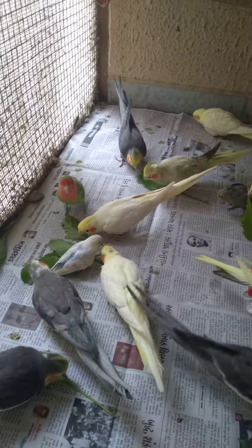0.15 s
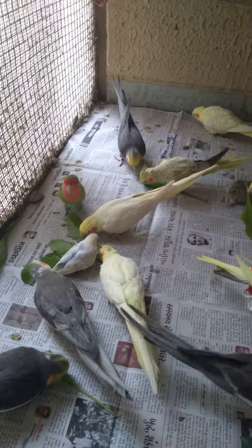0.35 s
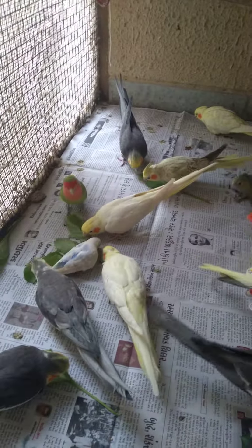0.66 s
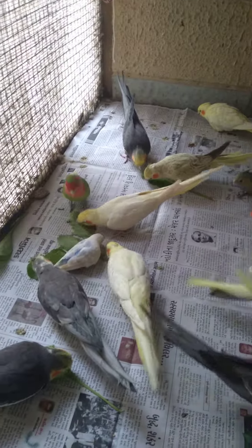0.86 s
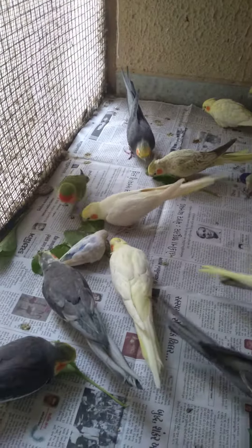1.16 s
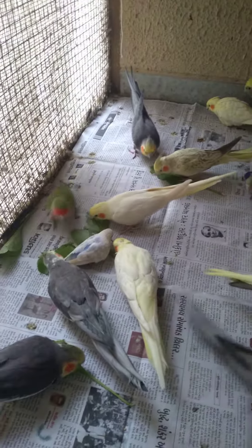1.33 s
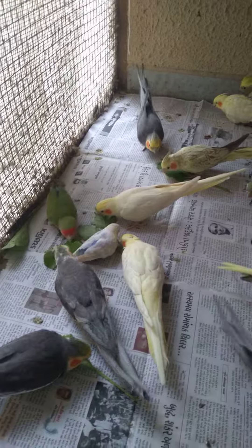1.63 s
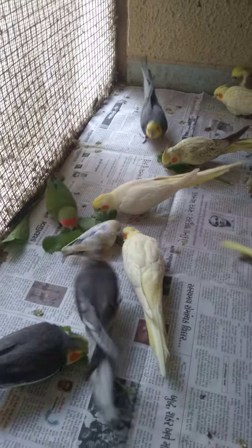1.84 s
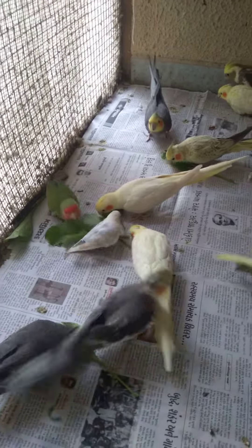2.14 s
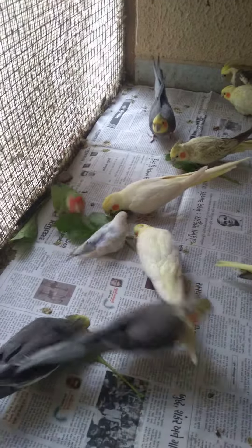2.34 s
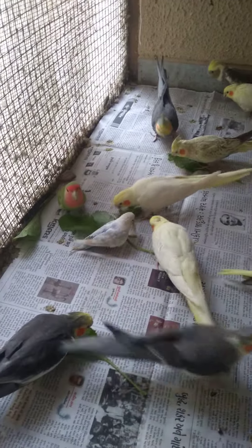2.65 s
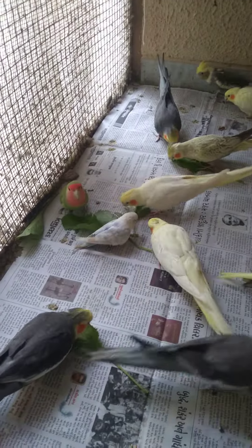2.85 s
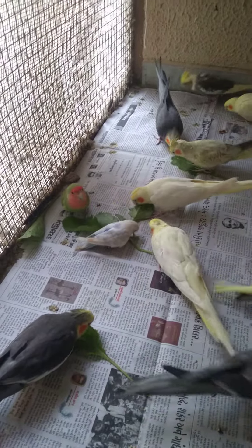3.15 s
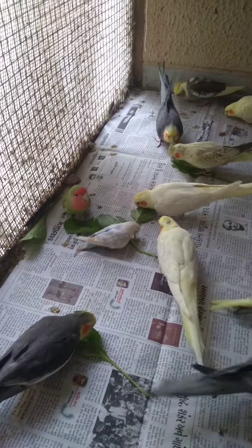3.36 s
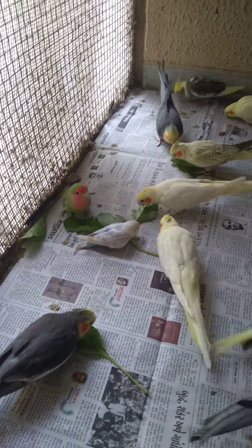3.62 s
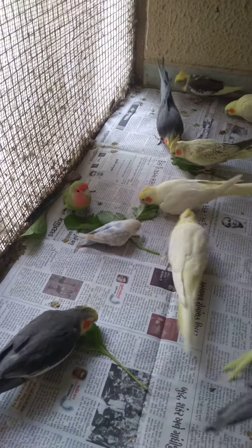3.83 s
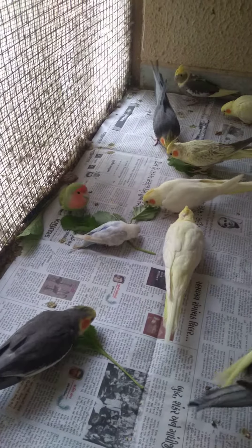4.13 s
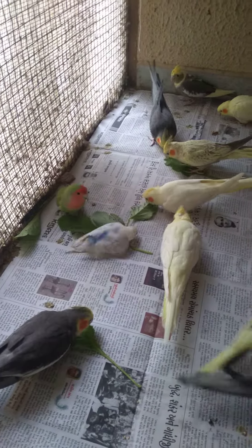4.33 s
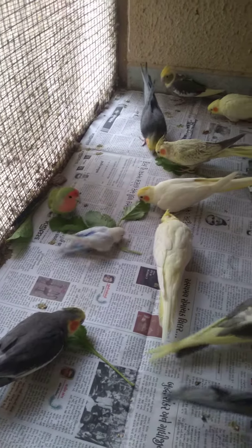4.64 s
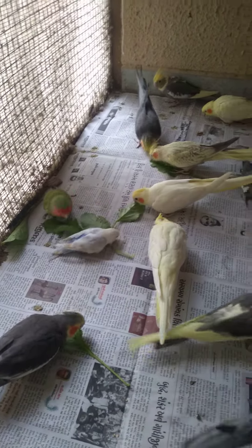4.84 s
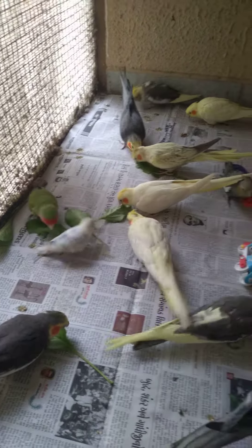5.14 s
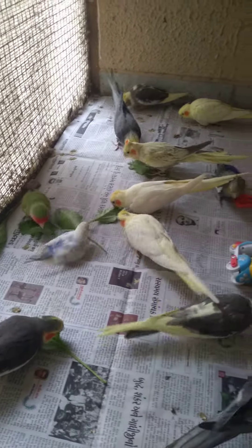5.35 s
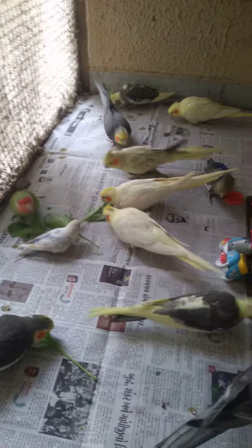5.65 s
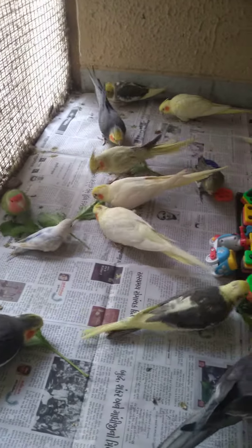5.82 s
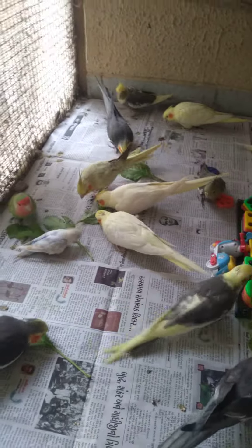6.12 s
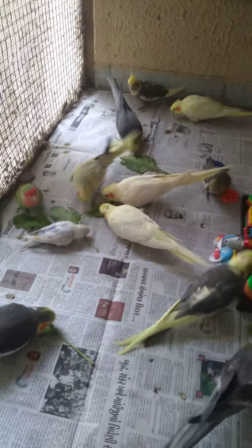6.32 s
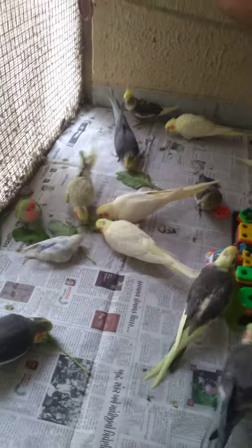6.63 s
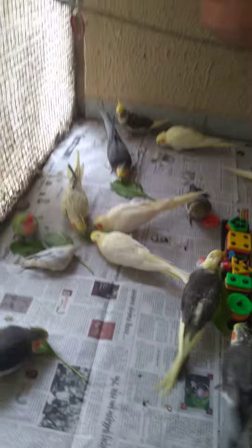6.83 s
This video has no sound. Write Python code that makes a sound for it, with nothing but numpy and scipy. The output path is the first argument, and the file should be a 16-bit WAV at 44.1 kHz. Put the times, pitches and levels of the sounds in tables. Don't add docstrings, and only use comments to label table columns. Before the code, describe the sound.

Small parrots snap beaks at leaves and rustle over newspaper in a bare-walled aviary, with brief chirps, squawks and a low traffic hum.

```python
import sys
import numpy as np
from scipy import signal
from scipy.fft import rfft, irfft, next_fast_len
from scipy.io import wavfile
from scipy.ndimage import uniform_filter1d, map_coordinates

SR = 44100
rng = np.random.default_rng(int(sys.argv[2]) if len(sys.argv) > 2 else 0)


def dump_mix(stems):
    frames = np.atleast_2d(stems).T
    limited = np.clip(frames, -1, 1)
    pcm = np.round(limited * 32767).astype(np.int16)
    wavfile.write(sys.argv[1], SR, pcm)


def voltage_ratio(decibels):
    exponent = np.asarray(decibels, float) / 20
    return 10 ** exponent


N = 307818


def unit(x):
    return x / np.sqrt(np.mean(x ** 2) + 1e-20)


def along(points, hz):
    f, v = np.transpose(points)
    return np.interp(np.log(hz + 1), np.log(f + 1), v)


def curves(rows, t):
    s, *cols = np.transpose(rows)
    return [np.interp(t, s, c) for c in cols]


def wobble(rate, size=N):
    knots = rng.standard_normal(int(size * rate / SR) + 4)
    return map_coordinates(knots, [np.arange(size) * rate / SR])


def strokes(rows):
    t = np.arange(N) / SR
    return sum(voltage_ratio(db) * np.exp(-8 * ((t - s) / length) ** 2) for s, length, db in rows)


def filtered(x, response):
    m = next_fast_len(N + 8192)
    return irfft(rfft(x, m) * response(np.fft.rfftfreq(m, 1 / SR)), m)[..., :N]


# f/Hz, likeness [0-1]
PORT_LIKENESS = [(30, 0.78), (120, 0.81), (300, 0.77), (900, 0.194), (2500, 0.0056)]


def rush(spectrum, patchy_db):
    z = signal.stft(rng.standard_normal((2, N + 512)), nperseg=512)[2]
    field = uniform_filter1d(rng.standard_normal(z.shape[1:]), size=6, axis=0)
    field = uniform_filter1d(field, size=8, axis=1)
    pair = signal.istft(z * voltage_ratio(patchy_db * unit(field)), nperseg=512)[1][:, :N]

    def mid_side(hz):
        turn = np.arccos(np.clip(along(PORT_LIKENESS, hz), -1, 1)) / 2
        return voltage_ratio(along(spectrum, hz)) * [np.cos(turn), np.sin(turn)]

    mid, side = filtered(pair, mid_side)
    return unit(np.array([mid + side, mid - side]))


def add(mix, s, sound, pan_db, lag):
    for port, way in enumerate((1, -1)):
        start = max(round(s * SR + way * lag / 2), 0)
        part = mix[port, start:][:len(sound)]
        part += voltage_ratio(way * pan_db / 2) * sound[:len(part)]


def small(rows, hz):
    chance = rng.standard_normal((len(rows), 2))
    return [(s, db, hz * (1 + 0.12 * a), 1.5 + 6 * b) for (s, db), (a, b) in zip(rows, chance)]


# t/s, peak level/dB, f/Hz, left-right/dB
SNAPS = [(0.1119, -29, 5400, 0.5), (0.2683, -40, 4270, 0), (0.3952, -39, 8100, -1.5),
         (0.4252, -33, 4100, 0), (1.4004, -42, 4370, 3), (1.5092, -35.5, 3820, 2),
         (2.005, -38.5, 4700, 0.5), (2.0845, -33, 6280, 6.5), (2.2355, -38.5, 7500, -1),
         (2.2874, -40, 5200, 6.5), (2.389, -35.5, 6100, 8), (2.6443, -37, 5100, 3),
         (2.6982, -40, 7800, 6.5), (2.719, -39.5, 6500, -1.5), (3.088, -43, 4480, 1),
         (3.531, -42, 7600, 5.5), (3.701, -30.5, 4070, 1.5), (3.8399, -36, 3270, 1),
         (3.8744, -29, 3730, -0.5), (4.051, -34, 3530, 1), (4.0809, -31.5, 4190, 0),
         (4.1906, -37, 8800, 4.5), (4.42, -36, 6680, -0.5), (4.449, -36.5, 8840, 2.5),
         (4.644, -35.5, 5000, 4.5), (4.755, -34, 3300, -2), (4.796, -36, 9400, -4.5),
         (4.8866, -31, 7500, -1), (5.735, -31.5, 4840, 0.5), (5.7948, -36, 4730, -1)]
# t/s, peak level/dB
BITES = [(.5262, -46), (.7792, -46.5), (1.1767, -47.5), (1.254, -41.5), (1.4591, -47.5), (1.6327, -40.5),
         (1.9042, -40), (2.7862, -41.5), (2.882, -47), (3.0069, -45), (3.041, -42), (3.2294, -62),
         (3.7854, -45), (4.5984, -46), (4.737, -62), (4.8634, -43.5), (5.0018, -49), (5.597, -43),
         (5.7201, -47), (6.0515, -44), (6.6634, -47.5), (6.813, -38)]
# t/s, peak level/dB
CLAW_TICKS = [(.38, -50), (1.3457, -52), (1.8452, -47), (2.7122, -40.5), (3.5968, -47.5), (5.3766, -46),
              (5.393, -41.5), (5.5278, -41), (5.652, -39.5), (6.5047, -38)]
# t/s, peak level/dB
TEARS = [(0.507, -50.5), (0.7041, -62), (0.8808, -63), (0.9324, -58), (1.1045, -59), (1.74, -58),
         (1.9647, -53), (2.9571, -56.5), (3.0578, -45.5), (3.261, -47), (3.7653, -49.5), (4.2348, -45.5),
         (4.2664, -40.5), (4.5526, -52), (4.6498, -32), (5.0795, -56), (5.3248, -60.5), (5.358, -47),
         (5.607, -41.5), (5.878, -52), (5.9828, -55.5), (5.9973, -62), (6.8044, -49), (6.917, -49.5)]


def pecks():
    mix, t = np.zeros((2, N)), np.arange(SR // 8) / SR
    crack = voltage_ratio(-60 * t / .008) * (1 - np.exp(-t / .001)) ** 2
    crinkle = .1 * voltage_ratio(-60 * t / .07) * (1 - np.exp(-t / .002))
    high_pass = signal.butter(2, 3600, "high", fs=SR, output="sos")
    events = [*SNAPS, *small(BITES, 5070), *small(CLAW_TICKS, 8830), *small(TEARS, 6400)]
    for s, db, hz, pan_db in events:
        ragged = voltage_ratio(3 * wobble(900, len(t)))
        burst = rng.standard_normal(len(t)) * (crack + crinkle) * ragged
        broad = signal.sosfilt(high_pass, burst)
        hump = signal.lfilter(*signal.iirpeak(hz, 3.5, SR), burst)
        snap = 0.86 * (hz / 5000) * broad + 1.25 * hump
        add(mix, s - .0015, voltage_ratio(db + 5.0) * snap / np.abs(snap).max(), pan_db, rng.uniform(-12.5, 14))
    return mix


# t/s, peak level/dB, level of the modes under 900 Hz/dB
DISH_BLOWS = [(0.111, -48, -11.5), (0.429, -58, -6.5), (1.177, -45.5, -22.5), (3.199, -40.5, -11),
              (3.341, -49.5, -6.5), (3.381, -49, -17.5), (3.672, -41.5, -13), (3.699, -27, -15.5),
              (3.837, -38.5, -26), (3.857, -38, -18.5), (3.874, -39, -15.5), (4.059, -30, -7),
              (4.082, -35.5, -19), (4.417, -50, -3), (4.489, -49.5, -23), (4.894, -50, -3.5),
              (5.53, -49, -6), (5.62, -50.5, 5), (5.722, -47.5, -7), (5.912, -55, -12.5), (6.067, -52, -16),
              (6.804, -78, -12.5)]
# f/Hz, level/dB, t60/s
DISH_MODES = [(474.6, 4, 0.0308), (620, 1, 0.069), (712.6, 7, 0.063), (952, -5.5, 0.0635),
              (1281.4, -2.5, 0.0358), (1403, 4.5, 0.0285), (1596, -1, 0.033), (1775, -4, 0.021)]


def knocks():
    mix, t = np.zeros((2, N)), np.arange(SR // 6) / SR
    for s, db, low_db in DISH_BLOWS:
        ring = np.zeros(len(t))
        for hz, level, t60 in DISH_MODES:
            mode_db = level + low_db * (hz < 900) + rng.normal(0, 2)
            ring += voltage_ratio(mode_db - 60 * t / t60) * np.sin(2 * np.pi * hz * rng.normal(1, .015) * t)
        rattle = 1 + .3 * wobble(500, len(t))
        ring = ring * rattle * (1 - np.exp(-t / 0.00058))
        add(mix, s, voltage_ratio(db) * ring / np.abs(ring).max(), -1.2, rng.uniform(3.7, 9.1))
    return mix


CALL_PAN_DB, CALL_LAG = .5, 3


def sing(rows, voice):
    rough, overtones_db, peak, rise_db, fall_db = voice
    mix = np.zeros((2, N))
    for s, length, first, last, db in rows:
        t = np.arange(s, s + length, 1 / SR)
        path = [(s, first, db - rise_db),
                (s + peak * length, first + peak * (last - first), db),
                (s + length, last, db - fall_db)]
        pitch, level_db = curves(path, t)
        phase = 2 * np.pi * np.cumsum(pitch * (1 + .2 * rough * wobble(900, len(t)))) / SR
        tone = np.sin(phase)
        for k, overtone_db in enumerate(overtones_db, start=2):
            tone += voltage_ratio(overtone_db) * np.sin(k * phase) * (k * pitch < SR / 3)
        flutter = voltage_ratio(1.5 * wobble(120, len(t)) + 5 * rough * wobble(600, len(t)))
        swell = voltage_ratio(level_db + 1.0) * signal.windows.tukey(len(t), .1)
        add(mix, t[0], swell * tone * unit(flutter), CALL_PAN_DB, CALL_LAG)
    return mix


def rasps(rows, throat):
    bursts_hz = 241.3 * (1 + 0.2493 * wobble(60))
    beat = np.sin(2 * np.pi * np.cumsum(bursts_hz) / SR)
    breath = rng.standard_normal(N) * (1 + 0.35 * beat)

    def resonances(f):
        return sum((-1) ** k * voltage_ratio(db) * 1j * f * w / (c * c - f * f + 1j * f * w)
                   for k, (c, w, db) in enumerate(throat))

    mix = np.zeros((2, N))
    add(mix, 0, strokes(rows) * unit(filtered(breath, resonances)), CALL_PAN_DB, CALL_LAG)
    return mix


# t/s, length/s, first f/Hz, last f/Hz, peak level/dB
WHISTLE_NOTES = [
    (.054, .03, 2770, 2870, -45),
    (.066, .052, 3620, 3560, -33.5),
    (3.125, .06, 3210, 3200, -55),
]
REEDY_NOTES = [
    (6.275, .065, 1445, 1440, -46),
    (6.34, .05, 1440, 1450, -50),
]
CLIMB_NOTES = [
    (6.322, .02, 1620, 1720, -45),
    (6.338, .026, 2080, 2020, -39),
    (6.361, .048, 2400, 2410, -38),
]
TOP_NOTES = [
    (6.407, .038, 2570, 2580, -33),
]
CHATTER_NOTES = [
    (.112, 0.11, 3050, 2900, -44.5),
    (.12, 0.14, 3600, 3650, -47.5),
    (.395, 0.0755, 2204, 2560, -57),
    (2.515, 0.1014, 2600, 2780, -39.5),
    (3.345, 0.139, 3141, 3200, -54.5),
    (6.338, .055, 1698, 1848, -41.5),
]
# roughness [0-1], overtone levels/dB, peak [share of length], rise/dB, fall/dB
WHISTLE_VOICE = (.22, (-16,), .45, 14, 6)
REEDY_VOICE = (.1, (-5, -30, -17), .6, 12, 3)
CLIMB_VOICE = (.15, (-20,), .5, 4, 3)
CLEAR_VOICE = (.05, (-14,), .5, 4, 8)
CHATTER_VOICE = (.36, (-12, -18), .3, 5, 10)
# t/s, length/s, level/dB
SQUAWKS = [
    (2.432, 0.044, -43.5),
    (2.49, 0.102, -37),
    (2.55, 0.118, -47),
]
HISS_CRIES = [
    (3.13, 0.085, -50.5),
    (3.19, 0.072, -49),
    (3.335, 0.066, -46),
    (3.385, 0.049, -49.5),
    (3.455, 0.0485, -51),
]
# f/Hz, width/Hz, level/dB
SQUAWK_THROAT = [(2280, 350, -2.5), (3650, 550, 0.5), (4590, 546, 2), (5660, 290, -3), (7500, 3000, -11)]
HISS_THROAT = [(3200, 700, -0.5), (4150, 570, 2), (4780, 700, 1), (5880, 750, -2)]


def near_birds():
    calls = sing(WHISTLE_NOTES, WHISTLE_VOICE) + sing(CHATTER_NOTES, CHATTER_VOICE)
    rising = sing(REEDY_NOTES, REEDY_VOICE) + sing(CLIMB_NOTES, CLIMB_VOICE) + sing(TOP_NOTES, CLEAR_VOICE)
    return calls + rising + rasps(SQUAWKS, SQUAWK_THROAT) + rasps(HISS_CRIES, HISS_THROAT)


# t/s, rustle level/dB
FLOCK_BUSTLE = [(0, -66), (.35, -72), (1.0, -70.5), (2.0, -68.5), (2.8, -69.5), (3.6, -67), (4.3, -65),
                (5.1, -69), (6.0, -65.5), (6.98, -67.5)]
# t/s, length/s, level/dB
PAPER_SHUFFLES = [(.15, 0.213, -56), (.53, 0.33, -67.5), (.97, 0.08, -74), (1.3, 0.42, -66),
                  (1.56, 0.13, -64.5), (1.98, 0.19, -79), (2.2, 0.24, -62.5), (2.43, 0.19, -55.5),
                  (2.64, 0.24, -59.5), (3.17, 0.22, -57.5), (3.41, 0.34, -62), (3.8, 0.3, -71),
                  (4.25, 0.5, -62.5), (4.48, 0.19, -62.5), (4.73, 0.31, -61.5), (4.95, 0.115, -64.5),
                  (5.17, 0.4, -67.5), (5.4, 0.08, -73), (5.6, 0.3, -64.5), (6.4, 0.32, -61.5),
                  (6.93, 0.25, -67)]
# t/s, length/s, level/dB
BODY_SCUFFLES = [(.1, .15, -84.5), (.44, 0.2, -70), (.68, 0.164, -70), (1.19, 0.22, -66.5),
                 (1.43, 0.213, -72), (1.65, 0.091, -73), (1.95, 0.35, -70), (2.52, 0.37, -63.5),
                 (3.19, 0.208, -65), (3.44, 0.244, -72), (3.75, 0.2, -58), (3.87, 0.16, -57.5),
                 (4.09, 0.1515, -51), (4.19, 0.14, -60), (4.5, 0.12, -61), (5.6, 0.25, -67.5),
                 (5.92, 0.592, -66), (6.33, 0.313, -64), (6.71, 0.138, -73)]
# f/Hz, level per Hz/dB
CRISP_PAPER = [(900, -9.5), (1500, -9), (2500, 0), (4300, -1), (5600, -4), (8800, -3.5), (10200, -15),
               (12500, -21.5), (16000, -32)]
DULL_PAPER = [(250, -54), (480, 4), (900, 2.5), (1600, 1), (2100, -4), (4000, -80)]


def rustle():
    busy = voltage_ratio(curves(FLOCK_BUSTLE, np.arange(N) / SR)[0])
    crisp_gain = np.hypot(busy, strokes(PAPER_SHUFFLES))
    dull_gain = np.hypot(voltage_ratio(-7.5) * busy, strokes(BODY_SCUFFLES))
    crackle_size = voltage_ratio(6.06 * np.minimum(rng.exponential(size=(2, N)), 3))
    crackles = (rng.random((2, N)) < 110 / SR) * crackle_size
    grit = signal.lfilter([1], [1, -.97], crackles)
    crisp = unit(rush(CRISP_PAPER, patchy_db=2.5) * (1 + 0.75 * grit))
    dull = rush(DULL_PAPER, patchy_db=3.5)
    gust = wobble(25)
    crisp_gust = voltage_ratio(7.0 + 2.8 * gust)
    dull_gust = voltage_ratio(4.0 + 0.94 * gust + 0.47 * wobble(22))
    return crisp_gain * crisp_gust * crisp + dull_gain * dull_gust * dull


# t/s, length/s, level/dB
CLAW_DRAGS = [
    (.415, 0.038, -46),
    (2.012, 0.077, -51.5),
    (2.083, 0.0118, -47),
    (4.205, 0.034, -46.5),
    (4.273, .02, -72),
    (4.652, 0.053, -45.5),
    (4.892, 0.048, -47),
    (6.82, 0.03, -48.5),
]


def claw_scrapes():
    return strokes(CLAW_DRAGS) * voltage_ratio(1.4 * wobble(300)) * rush(CRISP_PAPER, patchy_db=0.0)


# t/s, peak level/dB, f/Hz
LANDINGS = [
    (2.098, -48, 299.6),
    (3.2, -44, 414),
    (3.36, -70, 236),
    (3.879, -69, 130),
    (5.63, -46.5, 175),
    (6.82, -42.5, 265.8),
]


def landings():
    mix, t = np.zeros((2, N)), np.arange(SR // 6) / SR
    for s, db, hz in LANDINGS:
        thud = voltage_ratio(db - 60 * t / 0.068) * np.sin(2 * np.pi * hz * t)
        add(mix, s, thud * (1 - np.exp(-t / 0.0017)), -1.5, 3)
    return mix


# t/s, length/s, level/dB
WING_SWISHES = [
    (3.36, .05, -56),
    (4.24, .02, -59),
    (4.402, 0.041, -49),
    (4.882, 0.042, -63),
    (6.9, 0.12, -65),
]
# f/Hz, level per Hz/dB
FEATHER_HISS = [(6000, -18), (10000, 0.5), (13500, 6.5), (15500, 2)]


def feathers():
    return (strokes(WING_SWISHES) + voltage_ratio(-81.0)) * rush(FEATHER_HISS, patchy_db=1.5)


# t/s, length/s, first f/Hz, last f/Hz, peak level/dB
FAR_NOTES = [(1.09, 0.0687, 5110, 4150, -59), (1.12, 0.082, 2880, 2750, -62.5),
             (1.515, 0.098, 3292, 3259, -52), (1.89, .11, 2003, 2040, -67),
             (2.155, 0.055, 3200, 3200, -56.5), (4.29, 0.102, 3200, 3234, -60),
             (4.545, 0.058, 3188, 3230, -56.5), (5.08, 0.082, 4094, 3440, -56),
             (5.2, 0.067, 3135, 2430, -61.5), (6.105, 0.0406, 3590, 3250, -54.5),
             (6.165, 0.068, 2940, 2370, -58.5)]
# roughness [0-1], overtone levels/dB, peak [share of length], rise/dB, fall/dB
FAR_VOICE = (0.185, (), 0.14, 9, 8.3)


def far_birds():
    return sing(FAR_NOTES, FAR_VOICE)


# f/Hz, t60/s
WALL_DECAY = [(300, .3), (2500, .3), (8000, .22), (14000, .12)]


def room(x, chunk=11025):
    wet = np.zeros((2, N + chunk + SR // 2))
    for k in range(0, N, chunk):
        hz, t, z = signal.stft(rng.standard_normal((2, SR // 2)), SR, nperseg=256)
        decay = voltage_ratio(-60 * t / along(WALL_DECAY, hz)[:, None])
        tail = signal.istft(z * decay, SR, nperseg=256)[1][:, :SR // 2 - 256]
        echo = signal.fftconvolve(x[:, k:k + chunk], tail / np.linalg.norm(tail[0]), axes=1)
        start = k + 200
        wet[:, start:start + echo.shape[1]] += echo
    return wet[:, :N]


# f/Hz, level per Hz/dB
ROAD_SPECTRUM = [(8.8, -34), (15, 6.5), (48, -2.5), (113, -20), (172, -18), (253, -27), (315, -23.5),
                 (371, -29), (516, -29), (587, -35), (946, -41), (1060, -61), (1200, -57.5), (1560, -69.5),
                 (2640, -120)]
# t/s, level/dB
ROAD_SWELL = [(0.0, -46), (1.98, -46), (5.62, -47), (5.73, -42.5), (6.77, -48.5), (6.98, -47)]


def traffic():
    t = np.arange(N) / SR
    rumble = voltage_ratio(curves(ROAD_SWELL, t)[0]) * rush(ROAD_SPECTRUM, patchy_db=1.28)
    mains = voltage_ratio(-66.0 + 1.2 * wobble(5.2)) * np.sin(2 * np.pi * 120.5 * t)
    return rumble + mains


# f/Hz, level/dB
TREBLE_LOSS = [(8800, 2.5), (10000, -4), (11500, -14), (15500, -20)]


def scene():
    snaps, blows, near, far = pecks(), knocks(), near_birds(), far_birds()
    direct = snaps + blows + voltage_ratio(-1.5) * near + voltage_ratio(-1.5) * far
    send = voltage_ratio(-6.5) * snaps + voltage_ratio(-7.0) * blows + voltage_ratio(-2.0) * near + voltage_ratio(-3.5) * far
    birds = filtered(direct + room(send), lambda hz: voltage_ratio(along(TREBLE_LOSS, hz)))
    return birds + rustle() + claw_scrapes() + landings() + feathers() + traffic()


# f/Hz, left-right/dB
PORT_LEAN = [(60, 5), (240, 1.0), (950, -0.5), (3770, 1), (15000, 4)]


def microphone_ports(dry):
    return filtered(dry, lambda hz: voltage_ratio(np.outer([.5, -.5], along(PORT_LEAN, hz))) * (hz < 15950))


# from t/s, to t/s, depth/dB
SHUT_LULLS = [(0.327, 0.378, -13), (0.583, 0.658, -21.5), (0.655, 0.685, -8), (0.69, 0.714, -16),
              (0.747, 0.775, -8), (0.825, 0.886, -19.5), (0.906, 0.94, -9), (0.99, 1.08, -22),
              (1.07, 1.116, -7.5), (1.37, 1.396, -23.5), (1.675, 1.743, -20.5), (1.826, 1.85, -21.5),
              (2.351, 2.397, -25), (2.818, 2.863, -18), (2.939, 2.964, -18), (3.646, 3.679, -33),
              (4.002, 4.051, -21.5), (5.019, 5.046, -9), (5.046, 5.078, -14), (5.272, 5.292, -20),
              (5.294, 5.334, -19), (5.434, 5.457, -42), (5.461, 5.525, -24), (5.862, 5.882, -26),
              (5.954, 6.003, -10.5)]


def suppressor(ports):
    treble = filtered(ports, lambda hz: 1 / (1 + (850 / (hz + 1)) ** 4))
    t, shut_db = np.arange(N) / SR, np.zeros(N)
    for start, end, depth_db in SHUT_LULLS:
        closing, opening = (t - start) / 0.0068 + 1, (end - t) / 0.015
        shut_db += depth_db * np.clip(np.minimum(closing, opening), 0, 1)
    return ports - (1 - voltage_ratio(shut_db)) * treble


# f/Hz, level per Hz/dB
MIC_HISS = [(600, -40.5), (1200, 16.5), (5000, -3), (9000, -22), (11000, -12.5), (16000, -8)]


def self_noise():
    return voltage_ratio(-89.5) * rush(MIC_HISS, patchy_db=1)


def roll_off(x):
    return signal.sosfilt(signal.butter(12, 16000, fs=SR, output="sos"), x)


def record(dry):
    heard = suppressor(microphone_ports(dry)) + self_noise()
    return roll_off(heard)


dry = scene()
out = record(dry)
dump_mix(out)
```